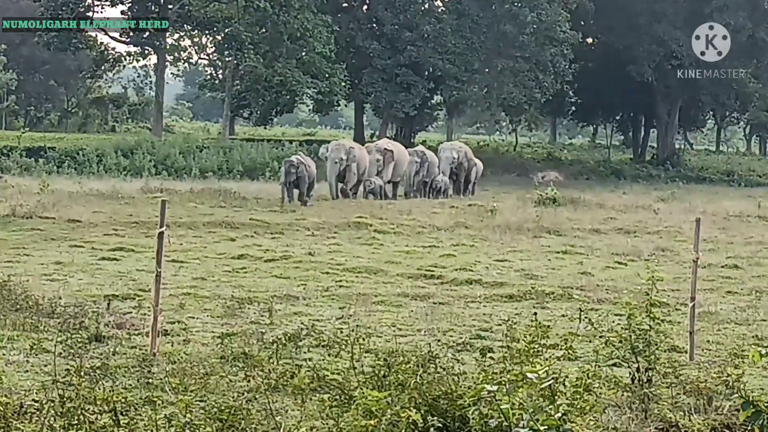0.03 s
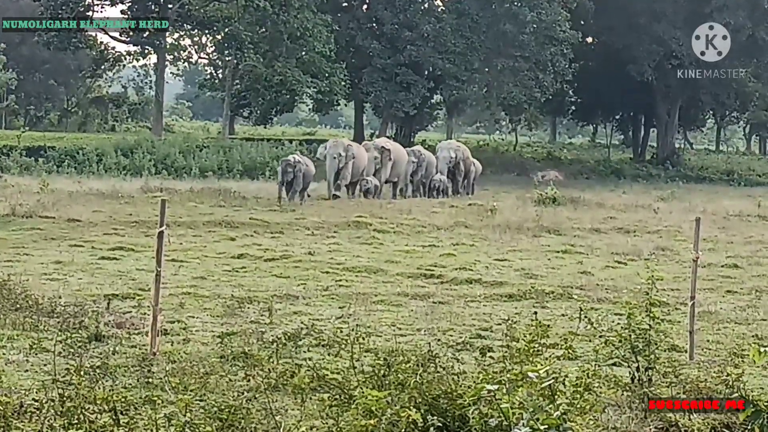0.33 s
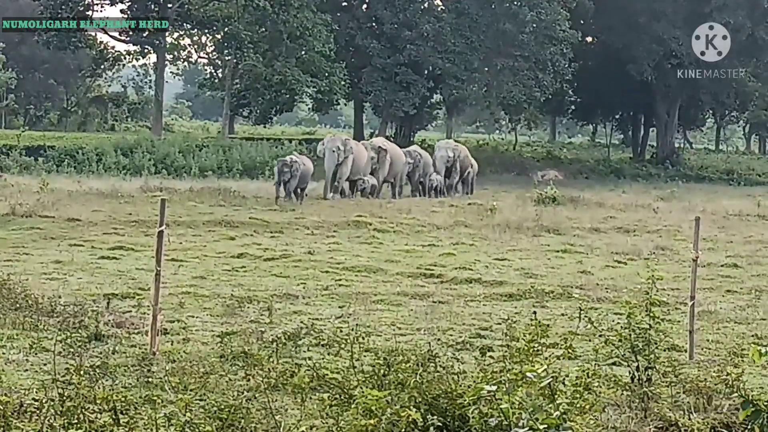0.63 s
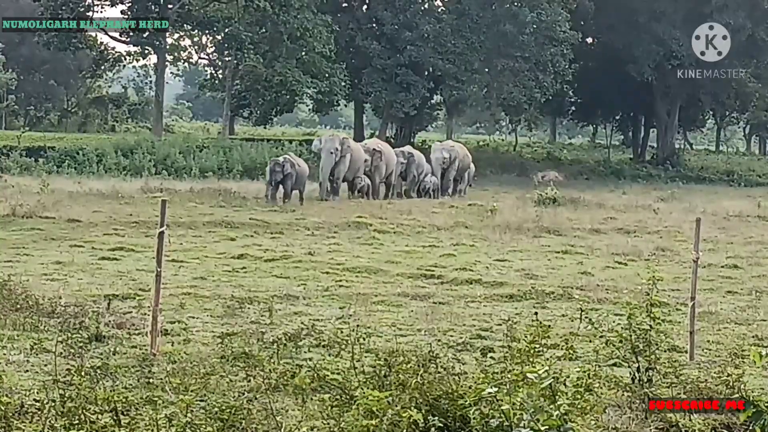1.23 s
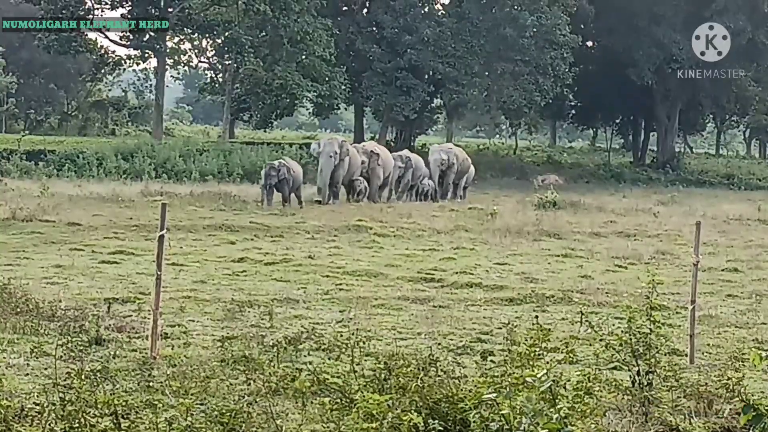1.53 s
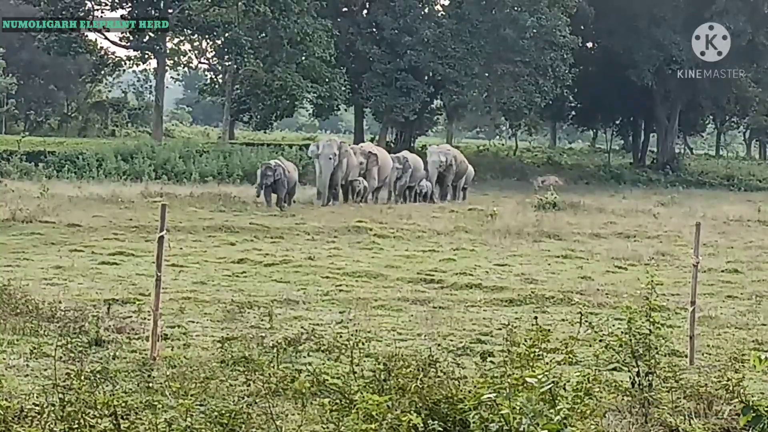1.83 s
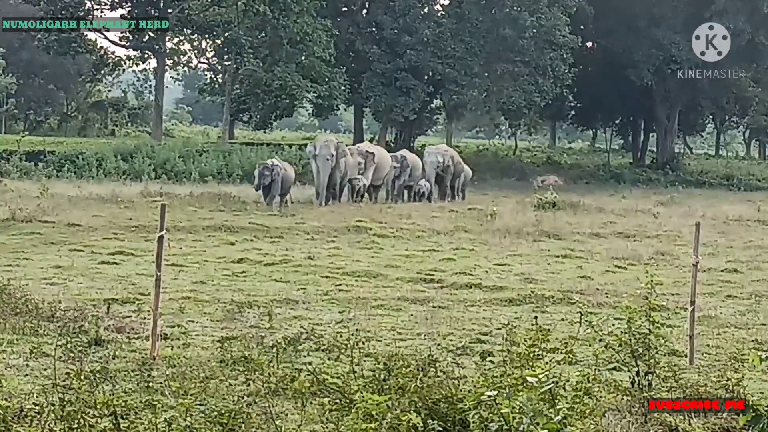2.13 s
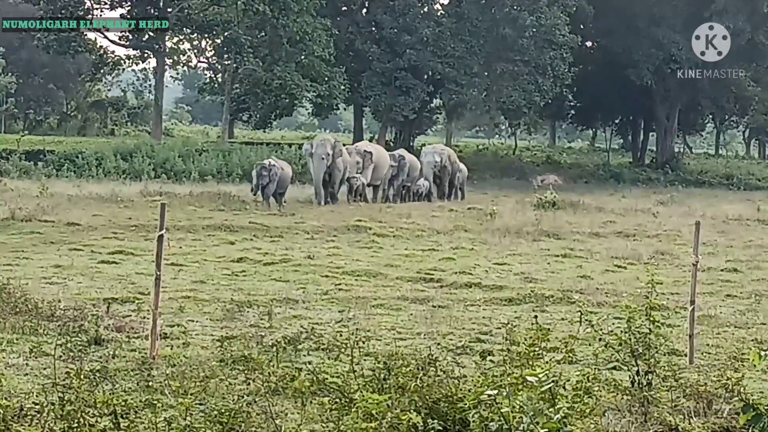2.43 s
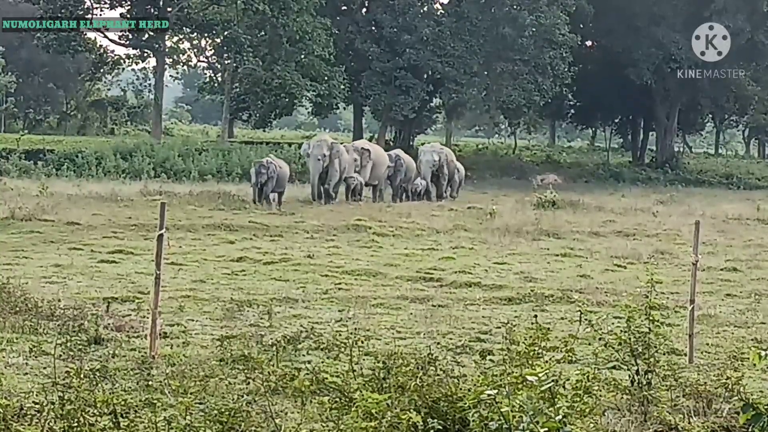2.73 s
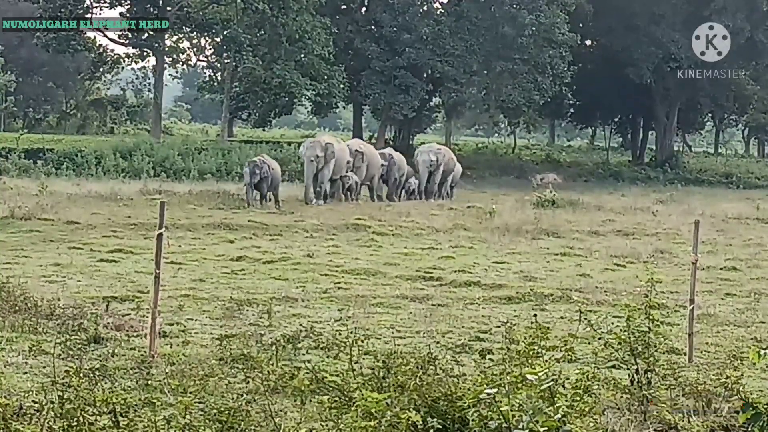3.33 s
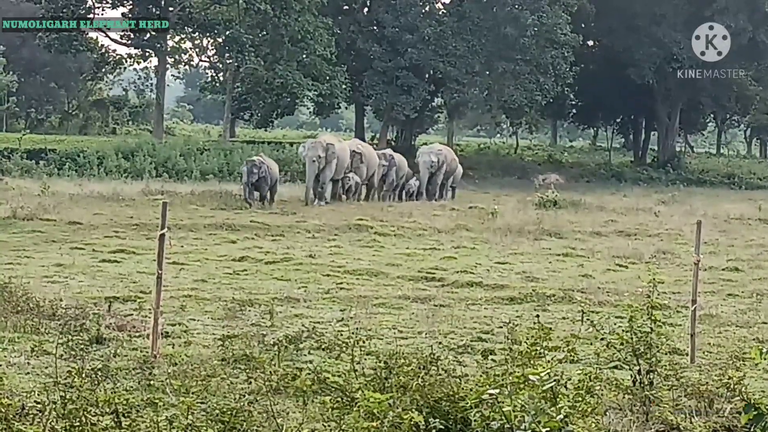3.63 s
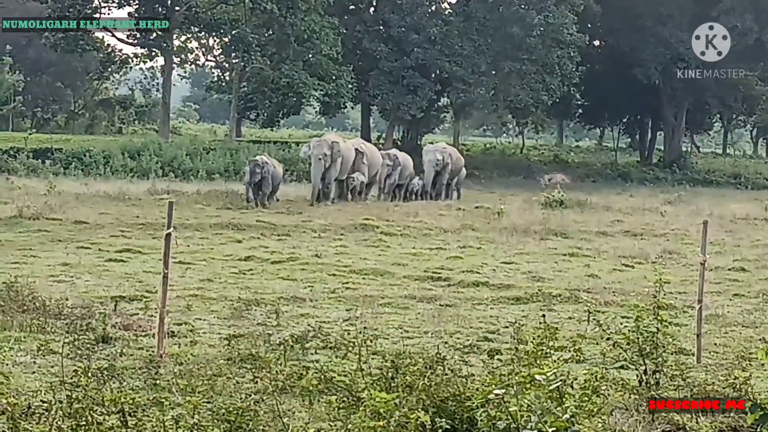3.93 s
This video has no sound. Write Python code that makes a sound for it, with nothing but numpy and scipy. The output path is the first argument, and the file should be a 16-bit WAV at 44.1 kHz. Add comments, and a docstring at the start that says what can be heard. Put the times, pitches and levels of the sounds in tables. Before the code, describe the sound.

A bird repeats rising whistles while a nearby camera shutter clacks in two quick bursts.

```python
"""A meadow at a forest edge. Bush crickets buzz with their wings throughout, over soft air and far twitter.
At once a camera close on the right clacks through four frames with its mirror and shutter, while a bird
repeats ten rising whistles that echo from the trees. A small bird ticks, faintly at first and louder
from 1.4 s. Soft far calls come and go from 1.2 s, and two harsh ones follow around 2 s.
At 2.5 s the camera fires three more frames."""
import sys
import numpy as np
from scipy import signal
from scipy.fft import rfft, irfft
from scipy.io import wavfile
from scipy.ndimage import uniform_filter1d

SR = 44100
rng = np.random.default_rng(int(sys.argv[2]) if len(sys.argv) > 2 else 0)


def generate_wav(sig):
    """Save sig (samples, or channels by samples) to the path in sys.argv[1] as 16-bit PCM at SR."""
    pcm = np.round(np.clip(np.atleast_2d(sig).T, -1, 1) * 32767).astype(np.int16)
    wavfile.write(sys.argv[1], SR, pcm)


N = 176400
T = np.arange(N) / SR


def amp(db):
    """Turn decibels into a factor to multiply by."""
    return 10 ** (np.asarray(db) / 20)


def unit(x):
    """Scale a signal to an average strength (rms) of 1."""
    return x / np.sqrt(np.mean(x ** 2) + 1e-20)


def add(out, start_s, x):
    """Mix x into out from start_s, dropping what falls outside the scene."""
    i = int(round(start_s * SR))
    x = x[..., max(-i, 0):max(N - i, 0)]
    out[..., max(i, 0):max(i, 0) + x.shape[-1]] += x


def drift(turns_per_s):
    """A randomly wandering curve with a typical size of 1."""
    points = rng.standard_normal(N // 20)
    return unit(np.interp(T * turns_per_s, np.arange(len(points)), points))


def phase(hz):
    """The running angle of a wave whose pitch changes."""
    return 2 * np.pi * np.cumsum(hz) / SR


def arch(progress):
    """A rounded rise and fall as progress goes from 0 to 1."""
    return np.sin(np.pi * np.clip(progress, 0, 1))


def resonate(x, hz, width_hz, order=1):
    """Ring around one pitch; white noise comes out about as strong as it went in."""
    edges = np.clip([hz - width_hz / 2, hz + width_hz / 2], 20, SR * .45)
    band = signal.butter(order, edges, "band", fs=SR, output="sos")
    return signal.sosfilt(band, x + 1e-18) * np.sqrt(SR / 2 / width_hz)


def place(x, pan_db, lag_s):
    """Make stereo: positive pan_db is louder on the left, negative lag_s reaches the left first."""
    return np.array([np.interp(T - lag_s, T, x) * amp(pan_db / 2), x * amp(-pan_db / 2)])


def trees(x, echo_db, fade_s, build_s):
    """Dense echoes off trunks and leaves, different on each side, falling 60 dB in fade_s."""
    t = T[:SR]
    echo = rng.standard_normal((2, SR)) * amp(-60 * t / fade_s) * (1 - np.exp(-t / build_s))
    echo /= np.sqrt(np.sum(echo ** 2, axis=1, keepdims=True))
    return amp(echo_db) * signal.fftconvolve(np.atleast_2d(x), echo, axes=1)[:, :N]


def noise(spectrum, alike):
    """Steady stereo noise shaped by a spectrum; alike (0 to 1) is the share both sides have in common."""
    hz, db = np.transpose(spectrum)
    white = rng.standard_normal((3, N))
    stereo = np.sqrt(alike) * white[0] + np.sqrt(1 - alike) * white[1:]
    gain = amp(np.interp(np.log(np.fft.rfftfreq(N, 1 / SR) + 1), np.log(hz), db))
    return unit(irfft(rfft(stereo) * gain, N))


def crickets():
    """Two bush crickets: every wing stroke is a scratchy downward sweep."""
    # each cricket: strokes_per_s, from_hz, to_hz, level_db, pan_db, lag_s
    singers = [(147.3, 11300, 9440, -2.5, 11.5, -.00023), (122.5, 11300, 9100, -9, -22.5, -.00032)]
    # loudness they share: time_s, level_db
    loudness = [(0.0, -68.5), (0.51, -65.5), (0.86, -65), (0.91, -69), (1.56, -67.5), (1.85, -64),
                (2.23, -64.5), (2.27, -68), (2.84, -69.5), (3.12, -64), (3.56, -62.5), (3.61, -68),
                (3.91, -71.5), (4.0, -74.5)]
    shared_db = np.interp(T, *np.transpose(loudness))
    out = 0
    for strokes_per_s, from_hz, to_hz, db, pan_db, lag_s in singers:
        progress = np.cumsum(strokes_per_s * (1 + 0.0043 * drift(9.7))) / SR % 1
        hz = from_hz + (to_hz - from_hz) * progress + 200 * drift(2500)
        song = unit(arch(progress) * np.sin(phase(hz)))
        song *= amp(db + 1.2 * drift(40) + shared_db)
        out = out + place(song, pan_db, round(lag_s * SR) / SR)
    return out + trees(out, echo_db=-9, fade_s=.15, build_s=.003)


def air():
    """Still air: a steady low rumble with a thin hiss."""
    # tone of the air: pitch_hz, level_db
    spectrum = [(25, -20.5), (45, -9.5), (70, -3.5), (100, -1.5), (200, -8), (450, -15), (1200, -17),
                (2500, -15), (4200, -24), (6800, -28.5), (8300, -9.5), (11000, -8)]
    return amp(-69.5) * noise(spectrum, alike=0.36)


def far_twitter():
    """Distant bird ticks blend into a flickering high hiss, mostly on the right."""
    # tone of the hiss: pitch_hz, level_db
    spectrum = [(3800, -34), (4600, -11.5), (5200, -3), (5550, -9), (6100, -50), (7000, -48.5)]
    # its swells: time_s, level_db
    loudness = [(0, -77.5), (2.1, -72.5), (2.6, -79), (3.2, -81.5), (3.6, -74.5), (3.75, -81.5),
                (3.88, -72.5), (4, -84)]
    level = amp(np.interp(T, *np.transpose(loudness)) + 0.97 * drift(37))
    return level * noise(spectrum, alike=0.078) * amp([[-7], [3]])


def random_clicks(per_s):
    """A quarter second of randomly timed clicks."""
    n = SR // 4
    return (rng.random(n) < per_s / SR) * rng.choice([-1, 1], n) * rng.uniform(0.65, 1, n)


def camera_body(force, click_hz):
    """The struck camera rings in four ways, one row each: thud, clack, ping, click."""
    # resonances of the body, low to high: pitch_hz, width_hz, level_db
    thud = [(780, 70, 0), (1050, 380, -1)]
    clack = [(1526, 150, 2.5), (2060, 480, 1.5), (2890, 190, -11.5)]
    ping = [(3604, 160, 0.05), (4174, 93, 0)]
    rows = []
    for part in (thud, clack, ping):
        rings = [amp(db) * resonate(force, hz, width_hz) * (-1) ** k
                 for k, (hz, width_hz, db) in enumerate(part)]
        rows.append(sum(rings) / np.sqrt(len(part)))
    rows.append(resonate(force, click_hz, width_hz=1260, order=2))
    return signal.sosfilt(signal.butter(4, [660, 8000], "band", fs=SR, output="sos"), np.array(rows))


def clatter(contacts):
    """A run of hard contacts, each one sharp blow with tiny bounces and a short rattle."""
    t = T[:SR // 4]
    bounce = amp(-9) * np.exp(-t / 0.0015)
    rattle = amp(-18.5) * np.exp(-t / 0.016)
    out = np.zeros((4, SR // 2))
    for delay_s, *levels_db, click_hz in contacts:
        force = random_clicks(per_s=4000) * (bounce + rattle)
        force[0] = 1   # the blow itself
        rings = camera_body(force, click_hz)
        add(out, delay_s, amp(levels_db)[:, None] * rings / np.abs(rings).max(axis=1, keepdims=True))
    return out


def winding(length_s=0.0739):
    """Gear teeth tick against the body while the motor resets the shutter."""
    # loudness of the gears: thud_db, clack_db, ping_db, click_db
    levels_db = [-67.5, -65, -69.5, -59.5]
    teeth = random_clicks(per_s=2500) * (T[:SR // 4] < length_s)
    rings = camera_body(teeth, click_hz=5930)
    return amp(levels_db)[:, None] * rings / rings[:, :int(length_s * SR)].std(axis=1, keepdims=True)


def camera():
    """For every frame the mirror lifts, the shutter fires and the motor winds."""
    # when each frame happens: mirror_s, shutter_s
    frames = [(-.0035, 0.069), (.267, 0.34), (0.5252, 0.6), (.783, 0.86), (2.464, 2.5418), (2.7283, 2.8017),
              (2.9852, 3.0617)]
    # blows of the mirror and of the shutter: delay_s, thud_db, clack_db, ping_db, click_db, click_hz
    mirror_contacts = [(0, -58.5, -68, -59, -34.5, 6250), (.002, -70, -60, -63, -49.5, 6200),
                       (.0113, -57, -50, -60, -49, 6300), (.0146, -56, -43.5, -65.5, -38, 5750),
                       (.0195, -74, -74, -64.5, -58, 6100), (.0443, -57.5, -57.5, -53, -39, 6140),
                       (.0461, -79, -72.5, -49, -36.5, 6000), (.054, -57.5, -53, -83, -65, 6250)]
    shutter_contacts = [(0, -51.5, -61, -54, -33.5, 5670), (.003, -68, -61.5, -65, -42.5, 5900),
                        (.0178, -60, -52.5, -66, -51, 6200), (.0213, -69.5, -63, -60.5, -41.5, 6200),
                        (.0695, -84.5, -72, -64, -52, 5900), (.078, -63.5, -56, -46.5, -49.5, 5900),
                        (.086, -64, -50, -51, -33.5, 5600), (.0885, -64.5, -52, -50, -45.5, 5670)]
    # left-right balance: thud_db, clack_db, ping_db, click_db
    pans_db = [2.5, -3, -6, -6.5]
    mirror, shutter = clatter(mirror_contacts), clatter(shutter_contacts)
    add(shutter, .02, winding())
    out = np.zeros((4, N))
    for mirror_s, shutter_s in frames:
        add(out, mirror_s, mirror)
        add(out, shutter_s, shutter)
    direct = sum(place(row, pan_db, lag_s=-0.0003306) for row, pan_db in zip(out, pans_db))
    ground = trees(direct, echo_db=-8, fade_s=.04, build_s=.001)
    return direct + ground + trees(direct, echo_db=-19, fade_s=.11, build_s=.009)


def whistling_bird():
    """Each note climbs to its top, sags, then breaks into a rasping upward flick."""
    # notes: start_s, length_s (without the flick), top_hz, level_db
    whistles = [(.010, 0.068, 3182, -40), (0.159, .068, 3130, -38), (.329, 0.066, 3152, -37.5),
                (.479, 0.067, 3138, -37), (0.635, 0.066, 3172, -38), (0.792, 0.067, 3166, -37),
                (.952, 0.062, 3159, -38), (1.105, 0.069, 3192, -39), (1.271, 0.067, 3203, -39.5),
                (1.444, 0.067, 3016, -40)]
    start_hz, sag_hz_per_s, swell_s = 2365, 3850, 0.059
    flick_s, flick_low_hz, flick_high_hz = 0.022, 2284, 3768
    progress = np.linspace(0, 1, int(flick_s * SR))
    flick_hz = flick_low_hz + (flick_high_hz - flick_low_hz) * progress ** 1.5
    flick_level = amp(-5.5 - 5.5 * progress) * np.minimum(10 * (1 - progress), 1)
    rasp = resonate(rng.standard_normal(N), hz=2630, width_hz=1000, order=3)
    voice, overtones = np.zeros((2, N))
    for start_s, length_s, top_hz, db in whistles:
        t = T[:int(length_s * SR)]
        rise_s = .74 * length_s
        climb_hz = top_hz - (top_hz - start_hz) * np.maximum(1 - t / rise_s, 0) ** 1.7
        sag_hz = sag_hz_per_s * np.maximum(t - rise_s, 0)
        swell = np.minimum(t / swell_s, 1) ** 0.31
        # join the note smoothly to its flick
        hz = uniform_filter1d(np.r_[climb_hz - sag_hz, flick_hz], size=180)
        level = uniform_filter1d(np.r_[swell, flick_level], size=60)
        level *= amp(db + 2.15 * drift(178.6)[:len(hz)])   # quick flutter
        angle = phase(hz * (1 + .006 * drift(500)[:len(hz)]))
        add(voice, start_s, level * np.sin(angle))
        voice += amp(db - 9.5) * arch((T - start_s - length_s) / flick_s) * rasp
        # overtones grow as the pitch climbs
        brightness = np.clip((hz - start_hz) / (top_hz - start_hz), 0, 1) ** 0.72
        upper_tones = amp(-21) * np.sin(2 * angle) + amp(-27) * np.sin(3 * angle)
        add(overtones, start_s, level * brightness * upper_tones)
    direct, bright = [place(x, pan_db=-4, lag_s=-0.0006625) for x in (voice, overtones)]
    main_tone = amp(-4.5) * direct + whistle_echoes(direct)
    return main_tone + bright + trees(bright, echo_db=2.5, fade_s=0.36, build_s=.008)


def whistle_echoes(voice):
    """The trees scatter the whistle, some pitches linger, and the forest edge sends back one clear echo."""
    # pitches that ring on: pitch_hz, level_db
    ringing = [(2464, -3.5), (2610, -19), (2711, -3), (2857, -6), (2945, -3.5), (3006, -15), (3118, -10),
               (3190, -9.5)]
    ring_width_hz, linger_hz, linger_width_hz, edge_delay_s = 13, 2950, 930, .072
    ring = sum(amp(db) * resonate(voice, hz, ring_width_hz) for hz, db in ringing)
    ring *= np.sqrt(2 * ring_width_hz / SR)   # take away the boost that resonate adds
    lingering = resonate(voice, linger_hz, linger_width_hz) * np.sqrt(2 * linger_width_hz / SR)
    echoes = trees(voice, echo_db=0.5, fade_s=0.24, build_s=0.0056)
    echoes += trees(lingering, echo_db=-7, fade_s=0.7, build_s=0.02)
    add(echoes, edge_delay_s, trees(lingering, echo_db=-12.5, fade_s=0.013, build_s=0.0016))
    return amp(6) * ring + echoes


def ticking_bird(faint_gap_s=0.09, faint_db=-78):
    """Each tick is two overlapping, slightly rough downward strokes; fainter ticks run on behind."""
    # the louder ticks: start_s, level_db
    ticks = [(1.372, -48), (1.533, -59), (1.571, -47), (1.612, -44.5), (1.66, -71), (1.771, -56),
             (1.807, -46.5), (1.847, -45), (1.893, -59.5), (1.965, -63), (2.205, -70), (2.245, -66.5),
             (2.335, -64), (2.405, -65)]
    # the strokes of one tick: delay_s, length_s, from_hz, to_hz, level_db
    strokes = [(0, 0.02, 5387, 5160, 1.5), (0.018, .016, 5344, 4795, -2.5)]
    faint_ticks = [((k + 0.49 * late) * faint_gap_s, faint_db + 3 * loud)
                   for k, (late, loud) in enumerate(rng.standard_normal((N // 2000, 2)))]
    waver_hz = 95 * drift(1200)
    out = np.zeros(N)
    for start_s, db in list(ticks) + faint_ticks:
        for delay_s, length_s, from_hz, to_hz, stroke_db in strokes:
            progress = np.linspace(0, 1, int(length_s * SR))
            hz = from_hz + (to_hz - from_hz) * progress
            hz += waver_hz[rng.integers(N // 2):][:len(hz)]
            add(out, start_s + delay_s, amp(db + stroke_db) * arch(progress) * np.sin(phase(hz)))
    direct = place(out, pan_db=-4.5, lag_s=-0.000608)
    leaves = trees(direct, echo_db=-3, fade_s=.035, build_s=.001)
    return direct + leaves + trees(direct, echo_db=-8, fade_s=0.3, build_s=0.007)


def soft_calls():
    """Far, wavering hoots and whistles; the forest blurs all but their lowest pitches."""
    # calls: start_s, length_s, first_hz, middle_hz, last_hz, level_db, pan_db
    calls = [(1.174, 0.037, 870, 870, 980, -71, -4), (1.263, 0.2, 996, 985, 970, -76, 18.5),
             (1.477, 0.05, 940, 864, 740, -69.5, 9), (1.764, 0.039, 4140, 3974, 4100, -62, -6),
             (1.827, 0.025, 4020, 3920, 3980, -61.5, -9), (1.831, 0.085, 1526, 1560, 1580, -77, -9),
             (1.859, 0.072, 650, 608, 572, -76.5, -5), (1.925, 0.0915, 1743, 1778, 1930, -69, -7),
             (1.945, 0.17, 345, 396, 367, -65.5, 9), (2.109, 0.083, 796, 855, 875, -70.5, -8),
             (2.681, 0.027, 1630, 1685, 1610, -74, 4), (3.219, 0.069, 3670, 3700, 3750, -87, -3),
             (3.364, 0.028, 2250, 2250, 2270, -80.5, -3), (3.735, 0.066, 6170, 6300, 6400, -85.5, -8),
             (3.863, 0.088, 3480, 3570, 3510, -81, -3), (3.417, 0.076, 3700, 3670, 3800, -83.5, -14),
             (3.435, 0.056, 4080, 4084, 3920, -71, -6), (3.528, 0.082, 1206, 1114, 967, -75, 12),
             (3.568, 0.079, 995, 1135, 1160, -68.5, -5.5), (3.637, 0.095, 1670, 1688, 1740, -75.5, 7),
             (3.677, 0.073, 1207, 1167, 1186, -78.5, -1), (3.939, 0.073, 1665, 1630, 1610, -75.5, 14)]
    out = np.zeros((2, N))
    for start_s, length_s, first_hz, middle_hz, last_hz, db, pan_db in calls:
        progress = np.linspace(0, 1, int(length_s * SR))
        glide_hz = np.polyval(np.polyfit([0, .5, 1], [first_hz, middle_hz, last_hz], 2), progress)
        waver_hz = 40 * min(middle_hz / 1100, 1) ** 1.32 * drift(260)[:len(progress)]
        call = amp(db) * arch(progress) ** 0.4 * np.sin(phase(glide_hz + waver_hz))
        add(out, start_s, call * amp([[pan_db / 2], [-pan_db / 2]]))
    high = signal.sosfilt(signal.butter(2, 600, "high", fs=SR, output="sos"), out + 1e-18)
    low = signal.sosfilt(signal.butter(2, 600, "low", fs=SR, output="sos"), out + 1e-18)
    return low + amp(-10) * high + trees(high, echo_db=2.5, fade_s=0.23, build_s=0.0026)


def harsh_calls(puffs_per_s=170):
    """Far off, rough and uneven puffs of air make a throat ring."""
    # calls: start_s, length_s, then one level_db for each throat resonance
    calls = [(1.79, 0.13, -62, -63.5, -74, -83), (2.035, 0.12, -68, -61.5, -72.5, -81.5)]
    # the four throat resonances: pitch_hz, width_hz
    throat = [(2330, 380), (3110, 550), (3800, 1430), (6900, 990)]
    breath = rng.standard_normal(N)
    pulsing = 1 + np.sin(phase(puffs_per_s * (1 + 0.05 * drift(90))))
    puffs = unit(breath * pulsing)
    out = np.zeros(N)
    for start_s, length_s, *levels_db in calls:
        swell = arch((T - start_s) / length_s) ** 0.87
        for (hz, width_hz), db in zip(throat, levels_db):
            out += amp(db) * swell * resonate(puffs, hz, width_hz, order=2)
    direct = place(out, pan_db=-5.0, lag_s=-0.00026)
    return direct + trees(direct, echo_db=2.0, fade_s=0.36, build_s=0.0035)


def scene():
    """The camera and all the callers over crickets, still air and far twitter."""
    meadow = crickets() + air() + far_twitter()
    return meadow + camera() + whistling_bird() + ticking_bird() + soft_calls() + harsh_calls()


def record(dry, cutoff_hz=11300):
    """The sound starts briefly louder and fades at the end; the highest treble is cut."""
    # overall loudness: time_s, level_db
    loudness = [(0, 3.5), (.02, 0), (3.88, -1.5), (4, -7.5)]
    faded = dry * amp(np.interp(T, *np.transpose(loudness)))
    return signal.sosfilt(signal.ellip(12, .2, 80, cutoff_hz, fs=SR, output="sos"), faded)


dry = scene()
out = record(dry)
generate_wav(out)
```